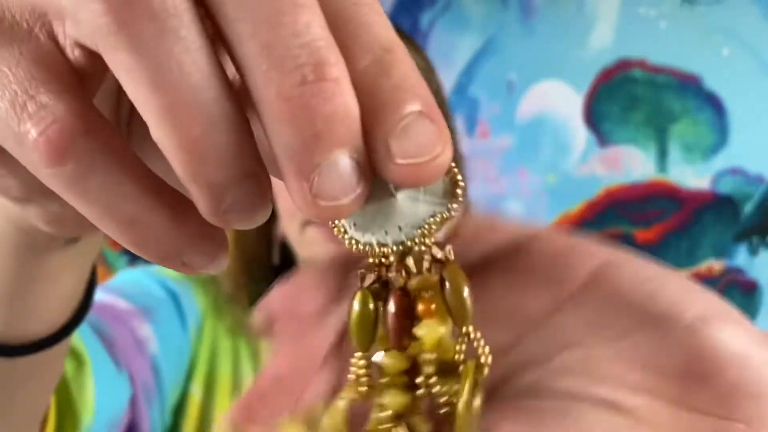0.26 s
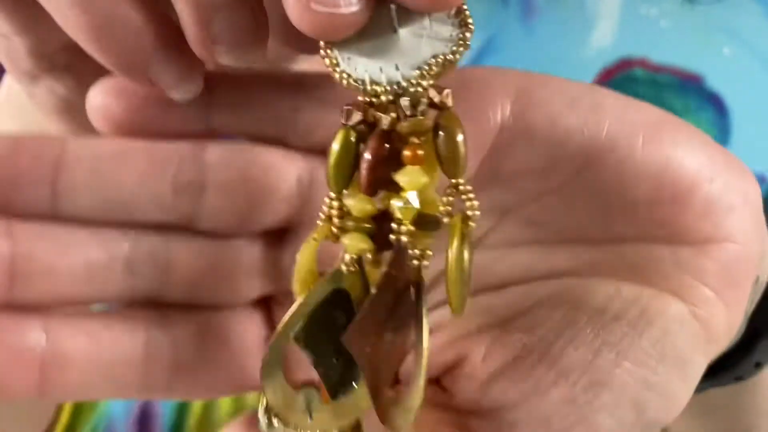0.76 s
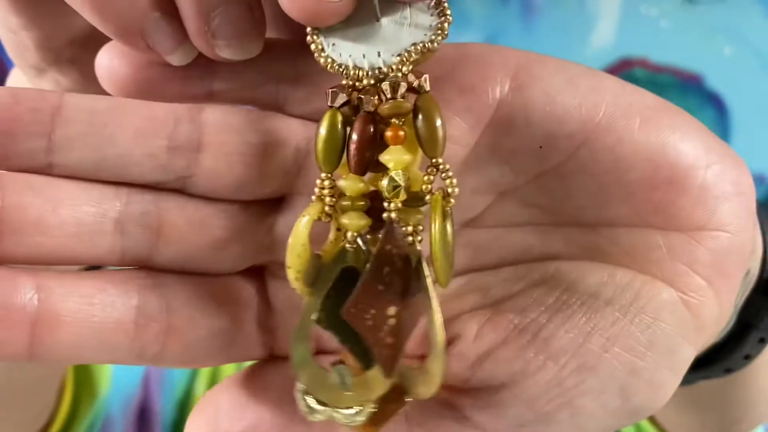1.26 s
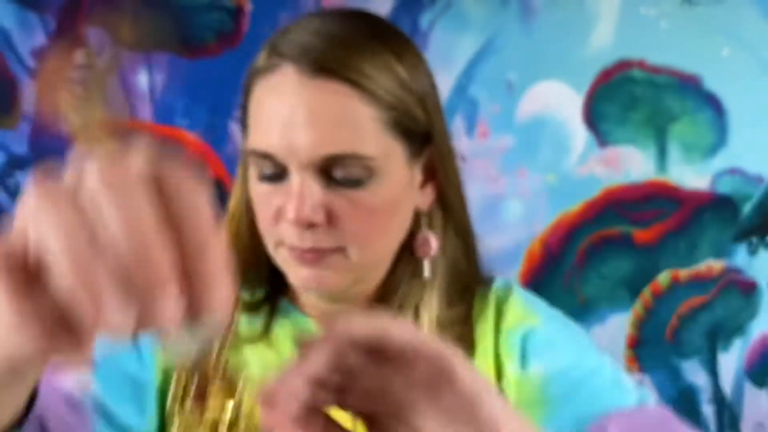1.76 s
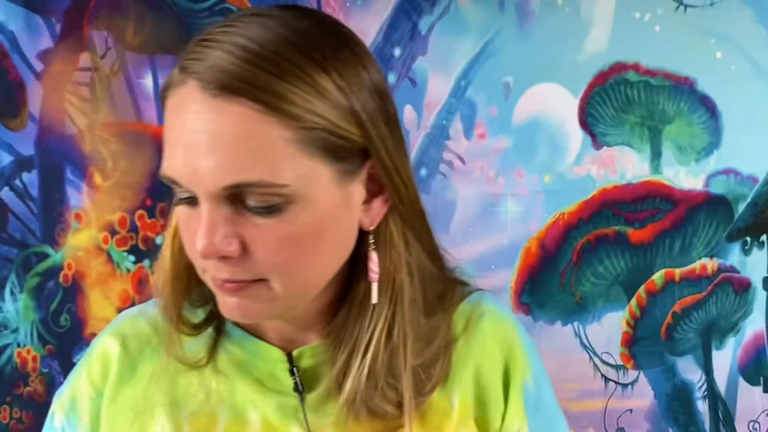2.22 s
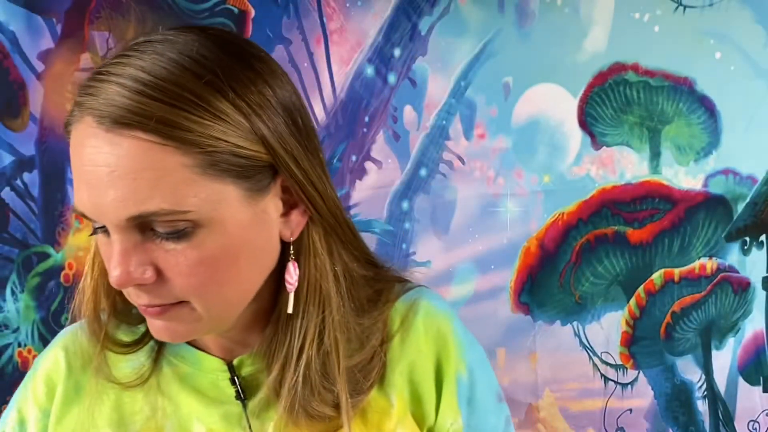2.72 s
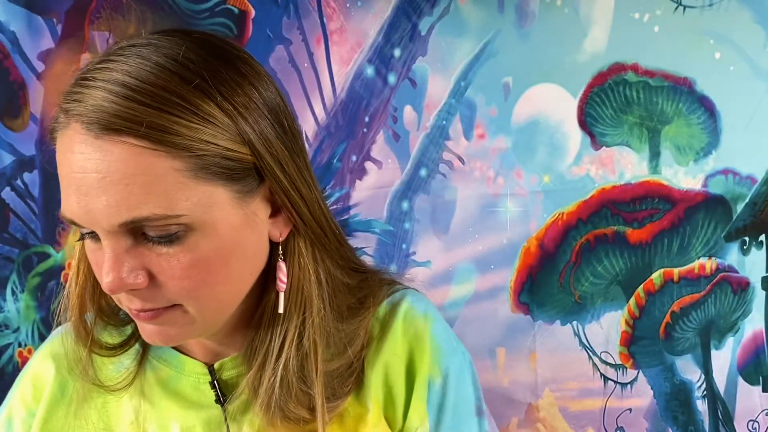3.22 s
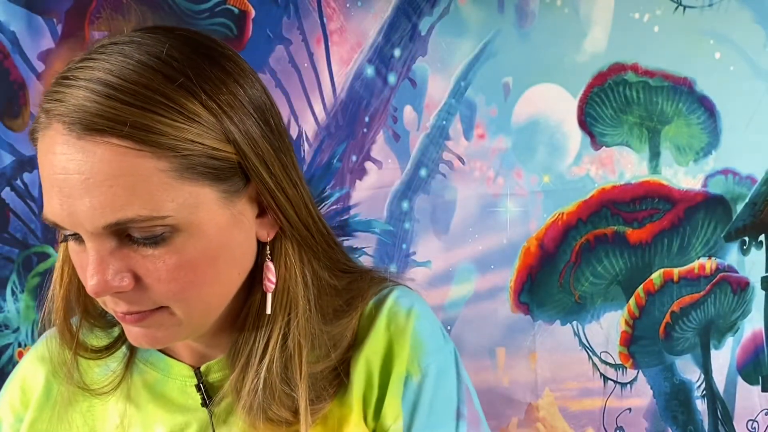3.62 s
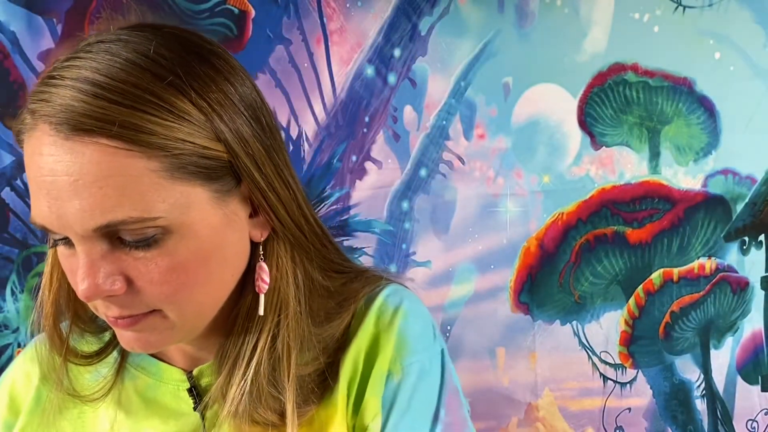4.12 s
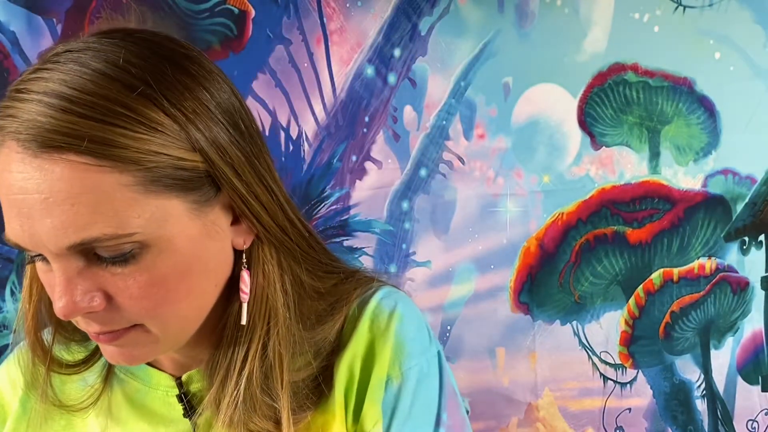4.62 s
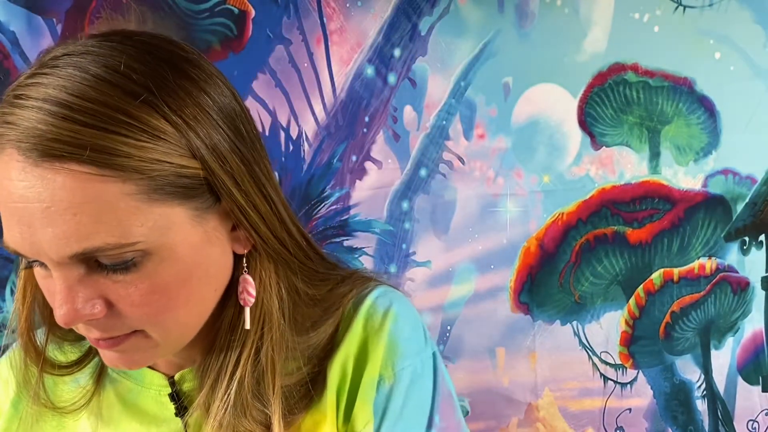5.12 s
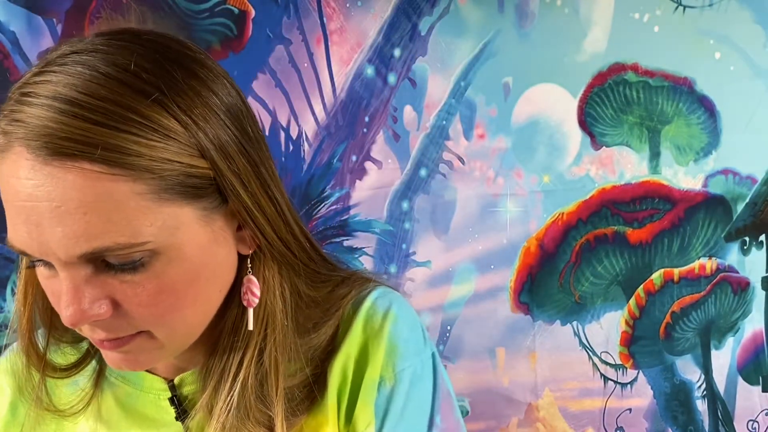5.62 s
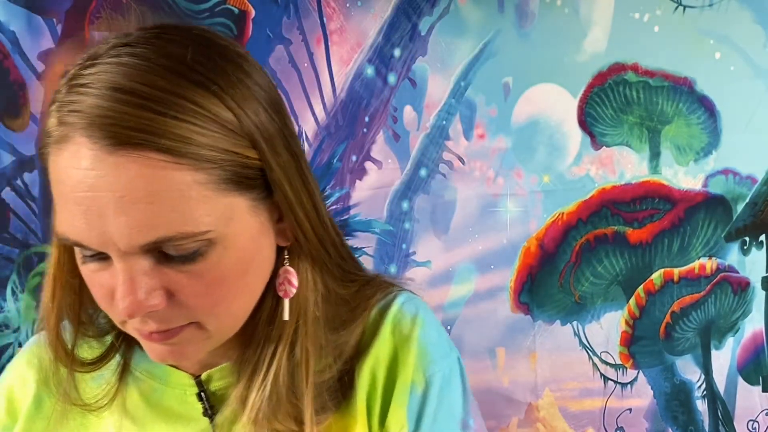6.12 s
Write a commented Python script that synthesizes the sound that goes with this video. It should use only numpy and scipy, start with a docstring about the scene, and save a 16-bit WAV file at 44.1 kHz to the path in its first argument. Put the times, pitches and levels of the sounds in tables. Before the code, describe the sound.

Costume jewelry handled near the microphone. At first only tiny beaded ticks and soft rubbing over low air noise; after a second and a half comes a strong muffled thump with low rumble. Sorting follows, with crinkly rustles, small plastic and metal taps on a hollow tray, a loud short rattle, very high tinkling and dull little thuds, then a late sharp clatter. Short indoor reflections.

```python
"""Sorting costume jewelry

A beaded earring dangles close to the microphone and is lowered as fingers start to sort a tray,
with a strong dull bump soon after and a few softer ones.
Beads and clasps click as noise bursts over the tray's modes; small metal parts ping as decaying sines.
Packing crinkles as filtered grains; moving arms rumble as swelling low noise.
Faint air noise lies behind, and a small room adds a diffuse tail to clicks, rubbing and pings."""
import sys
import numpy as np
from scipy import signal
from scipy.fft import rfft, irfft, next_fast_len
from scipy.io import wavfile
from scipy.ndimage import uniform_filter1d

SR = 44100
rng = np.random.default_rng(int(sys.argv[2]) if len(sys.argv) > 2 else 0)


def transcribe(signal):
    """Save signal, clipped to [-1, 1], as a 16-bit WAV file at the path in sys.argv[1]."""
    frames = np.atleast_2d(signal).T
    limited = np.clip(frames, -1, 1)
    pcm = np.round(limited * 32767).astype(np.int16)
    wavfile.write(sys.argv[1], SR, pcm)


N = 280917
TIME = np.arange(N) / SR
RING_TIME = np.arange(int(.3 * SR)) / SR
LEVEL_SAMPLES = int(.01 * SR)  # strikes and knocks are levelled on their first 10 ms

# beads and clasps striking: (time [s], level [dB], tray knock [dB rel], brightness [dB rel], t60 [s])
CONTACTS = [(0.014, -48, -8, 3, 0.0084), (0.0903, -42, -2.5, -13, .055), (0.1097, -44.5, -11, -18, 0.055),
            (0.2767, -54.5, -9, -1.5, 0.017), (0.6907, -40, -10.5, -4.5, .06),
            (0.8295, -49, -11, -6.5, 0.14), (0.8737, -53.5, -4.5, -8, .07), (1.4177, -52, 4.5, -16, .05),
            (1.4965, -46, -6, -6, 0.018), (1.5649, -48, -15, 0.5, .03), (1.5711, -38.5, -2, -2.5, 0.045),
            (1.64, -48, -3, 4, .024), (1.688, -45, -8, -2, 0.018), (1.8194, -45, 1, 0, 0.015),
            (1.8422, -49, -10, 0, 0.022), (1.8986, -43, -1, -2.5, 0.0072), (1.9332, -49.5, 8.5, 3, 0.029),
            (2.126, -40.5, 4, -4.5, 0.072), (2.1644, -46.5, -10, 9, .025), (2.1752, -28.5, -3, -25, 0.035),
            (2.1969, -29.5, -8, -9, 0.023), (2.2047, -49.5, -17, 9.5, 0.067), (2.2227, -54, 11, 11, 0.079),
            (2.3059, -31.5, -9, -12.5, 0.13), (2.3137, -39.5, 9, -3, 0.092), (2.3307, -37, 1, -5, 0.059),
            (2.4511, -41, -5, 0, 0.074), (2.5025, -40, -1.5, -2, 0.031), (2.5194, -52.5, 5, 9.5, 0.033),
            (2.663, -46, -3, 2.5, 0.03), (2.7372, -34.5, -7.5, -8.5, 0.065), (2.835, -42, -8, -7, 0.074),
            (2.93, -48, -14, -19, 0.0099), (2.9628, -41, -5, -21, 0.024), (3.1238, -49.5, -7, -2, .015),
            (3.1983, -45, -21, -10, .015), (3.3261, -46, -1.5, -7, 0.019), (3.3891, -39.5, -5, -6.5, 0.045),
            (3.4233, -39, -12, -8, .015), (3.492, -41, -2, -4.5, 0.029), (3.5989, -43.5, -13, -2, 0.016),
            (3.6496, -48.5, -15, -4, 0.017), (3.6986, -45.5, 1, 6, 0.024), (3.7259, -46, -14, 0.5, 0.0088),
            (3.746, -43.5, -3, -5, 0.044), (3.8232, -38, -7, -6, 0.051), (3.9219, -40.5, -6, -4, 0.015),
            (4.0958, -45, -20, 1.5, 0.013), (4.1183, -40.5, -12, -6, 0.0078),
            (4.1558, -44.5, 4.5, -1, 0.079), (4.2045, -50, 9, 4.5, 0.026), (4.2449, -45, 7, -4, 0.099),
            (4.2981, -49.5, -15, 4.5, 0.0078), (4.3121, -44.5, -13, 2, 0.012), (4.341, -45.5, -8, 5, 0.05),
            (4.356, -39.5, -5, -12, 0.086), (4.4812, -44, -1, -2.5, 0.11), (4.569, -49.5, 13, -2, .023),
            (4.5899, -42.5, -18, 3, 0.015), (4.6508, -48, -10, 2.5, .03), (4.6768, -39, -11, -5, 0.03),
            (4.7199, -41, 5.5, -15, .04), (4.875, -42.5, -1.5, 3.5, .014), (5.0716, -42, 3.5, -26, 0.074),
            (5.231, -45, -5, -8.5, 0.01), (5.2615, -54, 10, 5, 0.031), (5.3021, -42, 4.5, -23, 0.015),
            (5.3813, -33.5, 7, -12, 0.078), (5.3904, -31.5, -3, -0.5, .1), (5.4032, -35.5, 8.5, 1, 0.035),
            (5.4127, -32, -10, -0.5, .056), (5.4223, -28.5, -2, -0.5, 0.078),
            (5.5176, -33.5, -21, -5.5, .023), (5.5298, -28.5, -15, -3.5, 0.0091),
            (5.5323, -28, -14.5, -3, 0.056), (5.777, -38, -8.5, -2.5, 0.016), (5.97, -53.5, 0, 3.5, 0.027),
            (6.161, -48, -15, -8, .07), (6.2626, -35, -8.5, -1, 0.043), (6.2896, -40, -20, -0.5, 0.046)]
# tray modes: (frequency [Hz], level [dB rel], t60 [s])
TRAY_MODES = [(209, -9.5, 0.063), (284, -3, 0.09), (352, -6.5, 0.073), (386, -2, 0.058),
              (497.4, 1.5, 0.084), (559, 1.5, 0.078), (671, -0.5, 0.068), (752, -0.5, 0.074)]
# small metal parts ringing freely: (time [s], nominal pitch [Hz], level before mode gain [dB])
METAL_PINGS = [(0.014, 12800, -44), (0.031, 14500, -40), (.75, 14600, -51), (1.914, 12850, -37),
               (2.049, 14690, -50), (2.179, 14500, -25), (2.212, 14750, -29), (2.45, 14600, -38),
               (2.628, 13100, -34), (2.91, 13220, -38), (2.983, 13300, -38), (3.31, 13220, -41),
               (3.938, 13220, -34.5), (4.009, 13100, -37), (4.157, 13500, -35), (5.777, 13200, -33)]
# modes of a small metal part: (multiple of its pitch [ratio], gain [dB])
METAL_MODES = [(0.472, -18.5), (.83, -24), (0.999, -7)]
# hard beads chattering: (time [s], pitch [Hz], level [dB], t60 [s])
BEAD_RINGS = [(2.1645, 6470, -21, 0.0066), (2.1753, 6780, -11.5, 0.0064), (2.192, 6860, -23.5, 0.026),
              (2.1966, 1690, -14, 0.0062), (2.5, 5500, -21.5, 0.0066), (2.5035, 1380, -18, 0.015)]
# handfuls shifted: (start [s], length [s], crinkle [dB], tray scuff [dB rel], fine crackle [dB rel])
HANDFUL_MOVES = [(0, 0.31, -64.5, 7.5, -15), (0.324, .22, -67.5, 9, -18), (1.41, .15, -54, 2, -17.5),
                 (1.559, .39, -49, 1, -9.5), (1.969, .15, -56, 5, -6), (2.127, .41, -46.5, -5, -6),
                 (2.563, .17, -53.5, -2.5, -4.5), (2.801, .52, -56.5, -2.5, -8.5),
                 (3.326, .47, -55.5, -3.5, -4.5), (4.129, .23, -49.5, -18, -5), (4.527, .2, -51, 1, -6),
                 (4.738, .19, -50, -2, -13), (4.979, .11, -48, -3, -12), (5.267, .11, -54.5, -1, -14),
                 (5.543, .47, -58, -31, -13.5), (6.111, .26, -53, -16, -12.5)]
# spectra of rubbing: (frequency [Hz], spectral level [dB rel])
SCUFF_COLOUR = [(100, -7.5), (230, 1), (400, -3.5), (600, -7.5), (2500, -32.5)]
CRINKLE_COLOUR = [(300, -18), (720, -5), (1450, -3), (2200, -12), (2900, -12), (3900, -26), (6000, -41.5)]
CRACKLE_COLOUR = [(2000, -18), (2900, -10), (3800, -13.5), (5200, -5), (7000, -2.5), (9500, -11),
                  (11000, -8.5), (13000, -5.5), (16000, -22)]
# pieces dragged a short way: (middle [s], half length [s], resonance [Hz], level [dB])
DRAGS = [(0.363, 0.019, 1470, -57), (.657, 0.0061, 1410, -59), (0.926, 0.016, 1450, -59.5),
         (1.435, 0.027, 1500, -62), (2.209, 0.022, 1300, -29.5), (2.413, 0.078, 1360, -44),
         (4.897, .06, 1765, -51), (5.04, 0.064, 1680, -48), (5.552, 0.05, 3320, -41.5),
         (5.581, 0.066, 2400, -44.5), (5.65, 0.057, 1610, -47), (5.764, 0.06, 2150, -48.5)]
# soft bumps against the microphone stand: (time [s], level before mode gain [dB])
STAND_BUMPS = [(1.62, -17), (1.681, -2), (1.897, -19), (1.998, -23), (3.852, -19.5)]
# stand modes: (frequency [Hz], gain [dB], t60 [s])
STAND_MODES = [(34.8, -6.5, 0.26), (64, -2, 0.052), (107, -8.5, 0.01)]
# dull thuds on the bottom of the tray: (time [s], pitch [Hz], level [dB])
TRAY_THUDS = [(2.746, 242, -30.5), (3.038, 236, -38.5), (4.242, 223, -26.5), (4.353, 230, -32.5),
              (4.719, 225, -34), (5.382, 136, -23.5), (5.401, 175, -20)]
# larger arm movements: (middle [s], half length [s], level [dB])
ARM_SWELLS = [(.3, 1, -35), (2.82, 0.063, -35), (1.68, 0.2, -18), (1.93, 0.23, -21), (3.87, 0.5, -30.5),
              (4.3, 0.23, -28.5)]
# background spectra: (frequency [Hz], spectral level [dB rel])
RUMBLE_COLOUR = [(5, 12.5), (9, -5), (13, 13.5), (28, -15.5), (45, -11.5), (70, -25), (120, -28.5),
                 (250, -39), (700, -78)]
AIR_COLOUR = [(40, 6), (150, -19), (300, -8), (600, -16), (1200, -19.5), (3000, -30), (6200, -26.5),
              (9000, -34), (16000, -37)]
# room tail: (band centre [Hz], t60 [s], level [dB rel])
ROOM_BANDS = [(248, 0.26, -5), (506, 0.42, -4.5), (970, 0.17, 5), (2100, 0.4, -6), (3950, 0.21, 2),
              (8500, 0.28, -5), (13900, 0.28, -23)]

SORT_FROM_S = 1.4  # the earring is lowered and the sorting starts
SPARKLE_DB, SPARKLE_SLOPE, SPARKLE_LOSS = -8.5, 1.8, 0.63  # slope: dB per dB brightness; loss: dB per dB weight
MEDIUM_CONTACT_DB = -43.5  # a piece of medium weight
# faint stray contacts: level over the crinkle, knock, brightness, scatter
STRAY_DB, STRAY_KNOCK_DB, STRAY_BRIGHT_DB, STRAY_SPREAD_DB = -2, -8.5, -3, 4
STRAY_T60_S, PING_T60_S, THUD_T60_S = 0.01, 0.091, 0.06
# links and seed beads: mean pitch, pitch scatter, level over the crackle, level scatter, decay
LINK_HZ, LINK_OCTAVES, LINK_DB, LINK_SPREAD_DB, LINK_T60_S = 5900, 0.26, 21.5, 1, 0.0031
SCUFF_DB, CRINKLE_DB, CRACKLE_DB = -62, -60, -71  # light touch between handfuls
ATTACK_S, RELEASE_S = 0.035, 0.055  # a handful starts to move, and settles
SWAY_DB, AIR_DB = -31, -56.5  # arms at rest; air noise
CLICK_ROOM_DB, RUB_ROOM_DB, PING_ROOM_DB = -5, -18.5, -9.0  # sends to the room
TOP_HZ = 15900


def clicks(crinkle, count=3):
    """All contacts, strong and faint; each reaches the room from one of a few spots."""
    spots = np.zeros((count, N))
    for k, (s, db, knock_db, bright_db, t60) in enumerate(CONTACTS + strays(crinkle)):
        add(spots[k % count], s, contact(db, knock_db, bright_db, t60))
    return sum(spot + undb(CLICK_ROOM_DB) * room(spot) for spot in spots)


def contact(db, knock_db, bright_db, t60):
    """One contact rings the piece, its small beads and links, and the tray; heavy pieces sparkle less."""
    clack = strike(lo_hz=840, hi_hz=2340, t60=t60, crack=0.21)
    tick = strike(lo_hz=3080, hi_hz=8560, t60=0.59 * t60, crack=0.47)
    sparkle = strike(lo_hz=9500, hi_hz=14600, t60=0.34 * t60, crack=0.25)
    excess_db = max(db - MEDIUM_CONTACT_DB, 0)
    sparkle_db = SPARKLE_DB + SPARKLE_SLOPE * bright_db - SPARKLE_LOSS * excess_db
    hit = undb(knock_db - 3.5) * knock()
    add(hit, 0, undb(-2.55) * clack + undb(bright_db - 2.87) * tick + undb(sparkle_db) * sparkle)
    return undb(db) * hit


def strike(lo_hz, hi_hz, t60, crack):
    """A small piece is hit: a sharp crack, then decaying noise for a dense blur of modes."""
    t = RING_TIME[:len(RING_TIME) // 3]
    ring = decay(t, max(t60, .002)) * rng.standard_normal(len(t))
    ring[0] += crack * np.sqrt(np.sum(ring ** 2))
    return unit(band(ring, lo_hz, hi_hz), LEVEL_SAMPLES)


def knock(rise_s=0.00061):
    """The tray answers a blow a little late, with random mode shares for where it is hit."""
    hz, db, t60 = np.transpose(TRAY_MODES)[:, :, None]
    share, detune = rng.standard_normal((2, len(TRAY_MODES), 1))
    gain = undb(db + 1.4 * share) * np.sign(detune)
    modes = gain * np.sin(2 * np.pi * hz * (1 + 0.018 * detune) * RING_TIME)
    return unit(np.sum(modes * ring_shape(rise_s, t60), axis=0), LEVEL_SAMPLES)


def strays(crinkle, count=60):
    """Rows like CONTACTS for short chance contacts whose mean level follows the crinkle."""
    at = moments(crinkle, count)
    size, low, high = STRAY_SPREAD_DB * np.clip(rng.standard_normal((count, 3)).T, -2, 2)
    db = 20 * np.log10(crinkle[at]) + STRAY_DB + size
    t60 = np.full(count, STRAY_T60_S)
    return list(zip(TIME[at], db, STRAY_KNOCK_DB + low, STRAY_BRIGHT_DB + high, t60))


def metal():
    """Hooks and rings sing with one strong high mode and two weaker ones below it."""
    modes = []
    for s, hz, db in METAL_PINGS:
        for ratio, mode_db in METAL_MODES:
            modes.append((s, ratio * hz, db + mode_db, PING_T60_S))
    return rings(modes, rise_s=0.00033)


def beads():
    """Hard beads chatter as short single modes."""
    return rings(BEAD_RINGS, rise_s=0.00015)


def links(crackle, count=130):
    """Tiny links and seed beads tick as the pile moves, each at its own pitch."""
    at = moments(crackle, count)
    pitch, size = np.clip(rng.standard_normal((count, 2)).T, -2, 2)
    hz = LINK_HZ * 2 ** (LINK_OCTAVES * pitch)
    db = 20 * np.log10(crackle[at]) + LINK_DB + LINK_SPREAD_DB * size
    return rings(zip(TIME[at], hz, db, np.full(count, LINK_T60_S)), rise_s=0.0001)


def handling():
    """Gains of scuff, crinkle and crackle: light touch while sorting, plus each handful's envelope."""
    power = undb([[SCUFF_DB], [CRINKLE_DB], [CRACKLE_DB]]) ** 2 * (TIME > SORT_FROM_S)
    for s, length, db, scuff_db, crackle_db in HANDFUL_MOVES:
        shape = np.interp(TIME - s, [0, ATTACK_S, length, length + RELEASE_S], [0, 1, 1, 0])
        power = power + (undb([[db + scuff_db], [db], [db + crackle_db]]) * shape) ** 2
    return np.sqrt(power)


def rummage(scuff, crinkle, crackle, rate_hz=330, spread_db=5, limit_db=14, flurry_db=1.0, uneven_db=1.73):
    """Packing and chains slip in flurries of small steps, most faint and a few sharp."""
    push = wander(45)
    happens = rng.random(N) < rate_hz * undb(flurry_db * push) / SR
    slips = happens * undb(np.minimum(spread_db * rng.exponential(size=N), limit_db))
    low = scuff * colour(grains(slips, tail_s=0.0038, rub=0.54), SCUFF_COLOUR)
    middle = crinkle * colour(grains(slips, tail_s=0.0023, rub=0.44), CRINKLE_COLOUR)
    high = crackle * colour(grains(slips, tail_s=0.00055, rub=0.29), CRACKLE_COLOUR)
    return undb(uneven_db * push) * (low + middle + high)


def grains(slips, tail_s, rub):
    """Each tiny slip leaves a short noise burst, over the even hiss of rubbing."""
    keep = np.exp(-1 / (tail_s * SR))
    power = signal.lfilter([1], [1, -keep], slips ** 2)
    return np.sqrt(power / power.mean() + abs(rub)) * rng.standard_normal(N)


def scrapes(width):
    """A dragged piece chatters in fine slips through one resonance, swelling and fading."""
    out = np.zeros(N)
    for s, half, hz, db in DRAGS:
        swell = np.hanning(int(2 * half * SR))
        slips = rng.standard_normal(len(swell)) * (rng.random(len(swell)) < 1500 / SR)
        chatter = unit(band(slips, hz / (1 + width), hz * (1 + width), order=1))
        add(out, s - half, undb(db) * swell * chatter)
    return out


def bumps():
    """Soft blows ring the low modes of the stand, or thud on the bottom of the tray."""
    stand = [(s, hz, db + mode_db, t60) for s, db in STAND_BUMPS for hz, mode_db, t60 in STAND_MODES]
    tray = [(s, hz, db, THUD_T60_S) for s, hz, db in TRAY_THUDS]
    return rings(stand + tray, rise_s=0.0023)


def arm_rumble():
    """Moving arms: low noise at a steady level, raised by each larger movement."""
    gain = undb(SWAY_DB) + swells(ARM_SWELLS)
    return gain * colour(rng.standard_normal(N), RUMBLE_COLOUR)


def room_air():
    """Steady coloured noise of the quiet room."""
    return undb(AIR_DB) * colour(rng.standard_normal(N), AIR_COLOUR)


def room(x, gap_s=0.0014, wet_db=-0.5):
    """Walls and table return a diffuse noise tail, each band with its own decay; new noise per call."""
    t = np.arange(SR // 2) / SR
    tail = np.zeros(len(t))
    for hz, t60, db in ROOM_BANDS:
        noise = band(rng.standard_normal(len(t)), hz / np.sqrt(2), hz * np.sqrt(2))
        tail += undb(db) * noise * decay(t, t60)
    # silent for gap_s, then fades in over another gap_s
    tail = tail * np.clip(t / gap_s - 1, 0, 1) / np.sqrt(2 * LEVEL_SAMPLES)
    return undb(wet_db) * signal.fftconvolve(x, tail)[:N]


def rings(table, rise_s):
    """Single decaying modes from (time [s], pitch [Hz], level [dB], t60 [s]); soft contacts rise slower."""
    out = np.zeros(N)
    for s, hz, db, t60 in table:
        add(out, s, undb(db) * ring_shape(rise_s, t60) * np.sin(2 * np.pi * hz * RING_TIME))
    return out


def ring_shape(rise_s, t60):
    """Exponential build-up and decay of a mode."""
    return (1 - np.exp(-RING_TIME / rise_s)) * decay(RING_TIME, t60)


def decay(t, t60):
    """Exponential decay, 60 dB in t60 seconds."""
    return np.exp(-np.log(1000) * t / t60)


def moments(gain, count):
    """Random sample positions during the sorting, denser where the gain is high."""
    busy = np.cumsum(np.sqrt(gain) * (TIME > SORT_FROM_S))
    return np.searchsorted(busy, busy[-1] * (np.arange(count) + rng.random(count)) / count)


def wander(rate_hz):
    """A random level that changes about rate_hz times a second; rms 1."""
    step = int(SR / rate_hz)
    held = np.repeat(rng.standard_normal(N // step + 1), step)
    return unit(uniform_filter1d(held, step)[:N])


def swells(table):
    """A gain that rises and falls smoothly once per (middle [s], half length [s], level [dB])."""
    return sum(undb(db) * np.cos(np.pi / 2 * np.clip((TIME - s) / half, -1, 1)) ** 2 for s, half, db in table)


def colour(x, points):
    """Shape a sound by (frequency [Hz], level [dB]) points; rms 1."""
    hz, db = np.transpose(points)
    size = next_fast_len(N)
    bins_hz = np.fft.rfftfreq(size, 1 / SR)
    gain = undb(np.interp(np.log(bins_hz + 1), np.log(hz), db))
    return unit(irfft(rfft(x, size) * gain, size)[:N])


def band(x, lo_hz, hi_hz, order=3):
    """Causal band-pass."""
    edges_hz = [lo_hz, min(hi_hz, SR / 2 - 100)]
    return signal.sosfilt(signal.butter(order, edges_hz, "band", fs=SR, output="sos"), x)


def undb(db):
    """Decibels to gain."""
    return 10 ** (np.asarray(db) / 20)


def unit(x, count=None):
    """Scale to rms 1, judged on the first count samples."""
    return x / np.sqrt(np.mean(x[:count] ** 2) + 1e-20)


def add(out, s, sound):
    """Mix a sound in at time s [s]."""
    i = max(int(s * SR), 0)
    out[i:i + len(sound)] += sound[:max(N - i, 0)]


def scene():
    """Jewelry, bumps and rumble in a quiet room."""
    scuff, crinkle, crackle = handling()
    contacts = clicks(crinkle)
    rubbing = rummage(scuff, crinkle, crackle) + scrapes(width=0.087)
    pings = metal() + beads() + links(crackle)
    reverb = room(undb(RUB_ROOM_DB) * rubbing + undb(PING_ROOM_DB) * pings)
    return (contacts + rubbing + pings + bumps() + arm_rumble() + room_air() + reverb)[None]


def record(dry):
    """The recorder cuts the top with a steep low-pass."""
    return signal.sosfilt(signal.ellip(10, .2, 80, TOP_HZ, fs=SR, output="sos"), dry)


dry = scene()
out = record(dry)
transcribe(out)
```